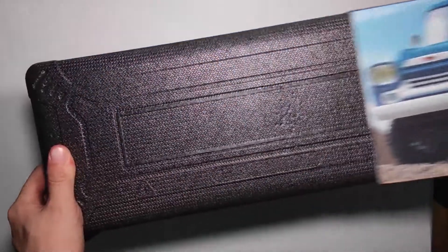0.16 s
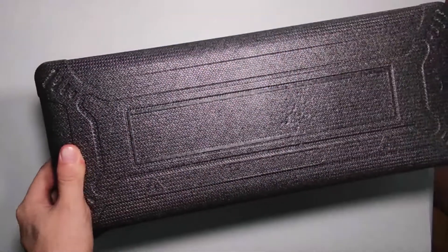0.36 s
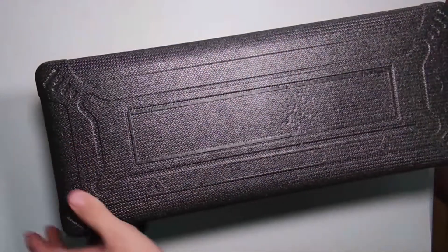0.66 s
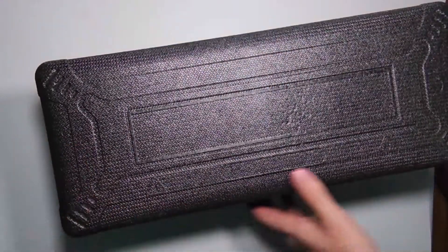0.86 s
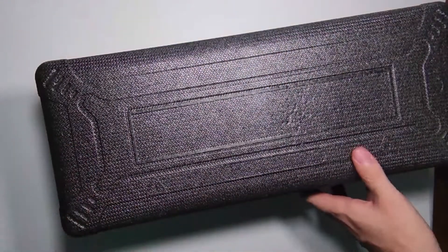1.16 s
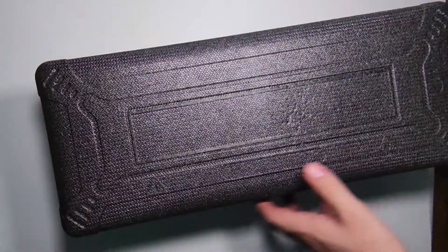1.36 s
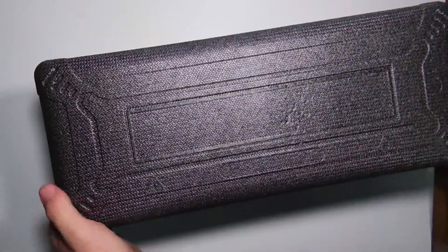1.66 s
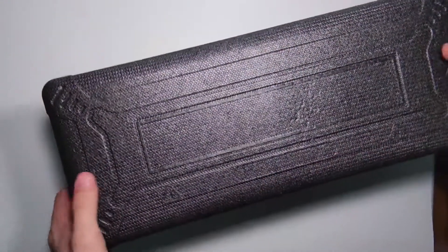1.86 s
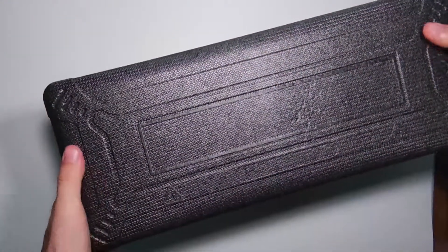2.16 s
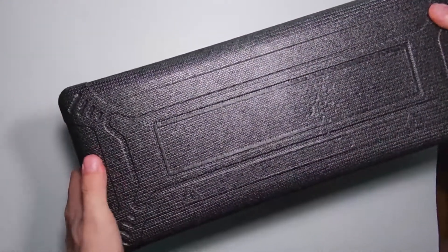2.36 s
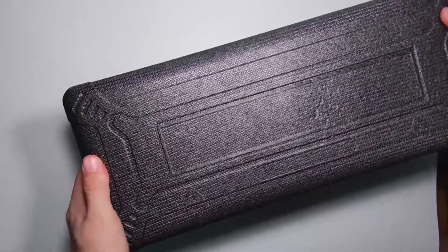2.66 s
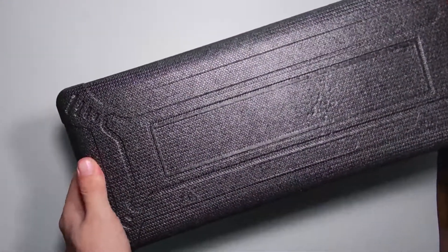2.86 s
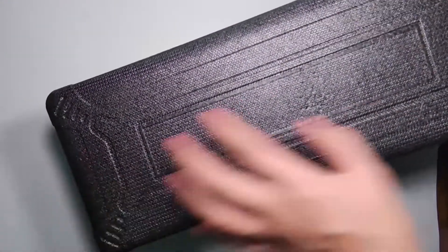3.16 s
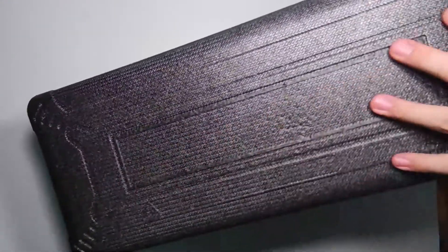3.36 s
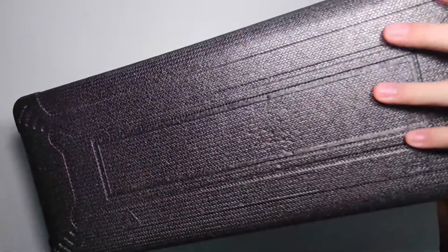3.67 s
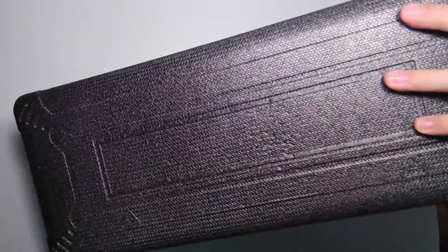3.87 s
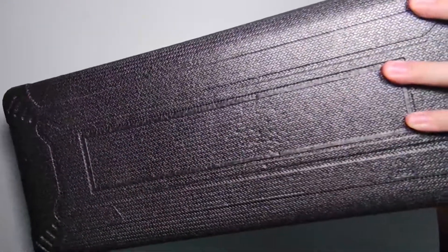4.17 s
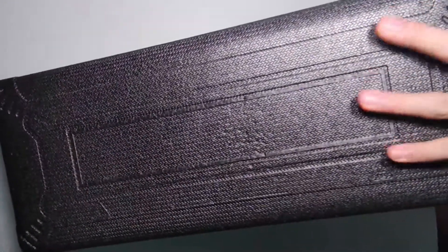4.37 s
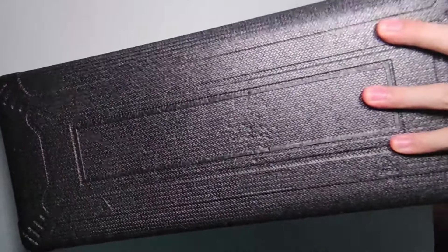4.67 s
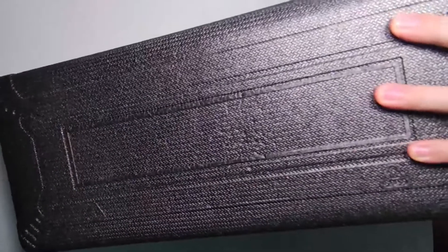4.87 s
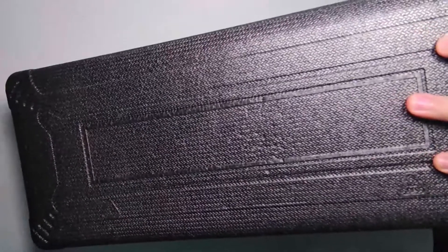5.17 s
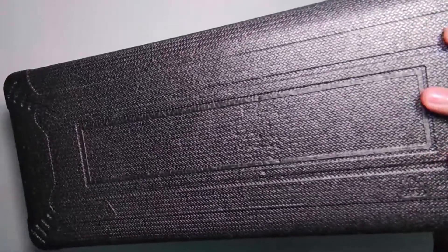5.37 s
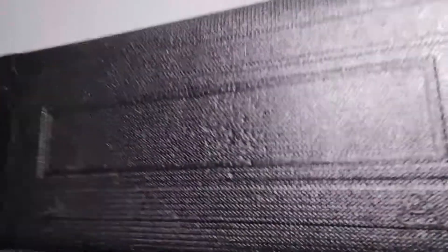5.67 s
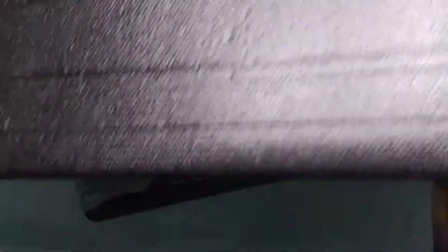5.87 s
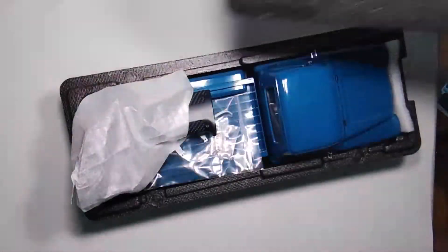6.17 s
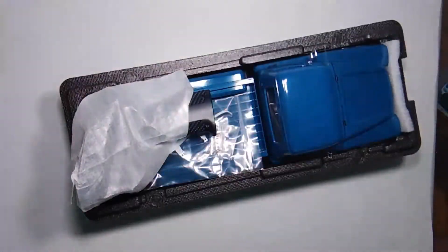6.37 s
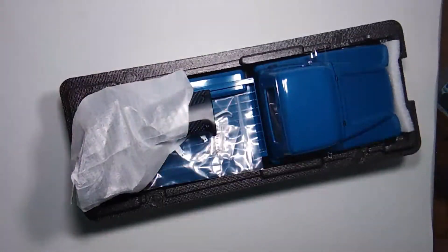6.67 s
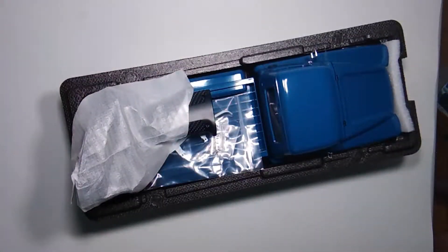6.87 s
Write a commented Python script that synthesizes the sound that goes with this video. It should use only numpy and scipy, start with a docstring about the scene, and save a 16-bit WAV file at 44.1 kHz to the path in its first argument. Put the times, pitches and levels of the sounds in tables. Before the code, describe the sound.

In a small quiet room, close to the microphone, a cardboard sleeve rasps quickly off a moulded tray with a rising hollow tone. It lands farther off with a loud flat slap and short skid. Hands softly rub, turn and tap the tray, then the tight lid scrapes free with hard hollow knocks and is gently shoved aside.

```python
"""In a small room a cardboard sleeve is pulled off a moulded tray, tossed aside and lands with a slap.
Hands rub and turn the tray on a table; its lid scrapes free, knocks hollowly and is shoved aside.
Rubbing is noise made of countless slips, squeaks and rasps are gliding resonances, and blows are
bursts of noise with damped modes. The walls answer with a decaying tail over faint room noise."""
import sys
import numpy as np
from scipy import signal
from scipy.fft import rfft, irfft, next_fast_len
from scipy.io import wavfile
from scipy.ndimage import uniform_filter1d, map_coordinates

SR = 44100
rng = np.random.default_rng(int(sys.argv[2]) if len(sys.argv) > 2 else 0)


def int16_out(signal):
    """Quantize to a 16-bit WAV file."""
    q = np.round(np.clip(np.atleast_2d(signal).T, -1, 1) * 32767)
    wavfile.write(sys.argv[1], SR, q.astype(np.int16))


N = 310023  # length in samples

# The quiet room's noise. Each row: frequency in Hz, relative level in dB.
AIR_SPECTRUM = [(12, -34.5), (20, -6), (27, 0), (419, -5.5), (456, -5.5), (603, -5), (1650, -11.5),
                (3040, -14.5), (5470, -17.5), (7650, -18.5), (10100, -18.5), (11000, -19), (15800, -18.5)]
# Decay of the room's tail. Each row: frequency in Hz, t60 (time to fall 60 dB) in seconds.
ROOM_DECAY = [(100, 1), (300, 0.42), (900, 0.37), (2500, 0.56), (5000, 0.6), (14000, 0.21)]

# The sleeve rubs along the tray as it is pulled off; layer gains follow.
# Each row: time in seconds, then body, hiss and rumble before those gains in dB.
SLEEVE_SLIDE = [(0.0, -43, -52, -68), (0.03, -49, -55.5, -50), (0.084, -43, -48.5, -46),
                (0.142, -45, -48, -59), (0.214, -45.5, -50, -58), (0.28, -40.5, -46.5, -77),
                (0.4, -38.5, -51, -49), (0.425, -50.5, -56, -47)]
# Hiss of card on plastic. Each row: frequency in Hz, relative level in dB.
CARD_SPECTRUM = [(820, -45), (1400, -9), (1500, -14), (1770, -4), (2040, -8.5), (2320, -3.5), (2960, -6.5),
                 (3250, -5), (4820, -10), (7310, -13), (9330, -15.5), (14600, -26.5), (15800, -34.5)]
# Body of the rubbed tray. Each row: frequency in Hz, relative level in dB.
TRAY_SPECTRUM = [(76, -38), (130, -22), (183, -2.5), (244, -4.5), (335, -0.5), (372, 1.5), (477, 1.5),
                 (551, -2), (884, -4), (957, -5.5), (1050, -7), (1750, -21), (3000, -35), (3900, -46),
                 (6600, -120)]
# The tray shifting on the table. Each row: frequency in Hz, relative level in dB.
RUMBLE_SPECTRUM = [(20, -5.5), (45, -16), (110, 1), (170, 0), (260, -13.5), (500, -53)]
# The air cavity between sleeve and tray sings upward as the sleeve slides off.
# Each row: time in seconds, base resonance in Hz, level in dB.
CAVITY_GLIDE = [(.02, 112.8, -68), (.1, 190.7, -59), (.19, 299, -43), (.27, 358, -41.5), (.34, 400, -54),
                (.39, 435, -35.5), (.42, 460, -62)]
# The cavity's overtones. Each row: ratio to the base resonance, relative level in dB.
CAVITY_OVERTONES = [(1.001, 7), (2.029, -7), (3.801, -14.5)]
# The sleeve chatters as it slides. Each row: time in seconds, mean slip rate in Hz, mean level in dB.
SLEEVE_CHATTER = [(.05, 446, -55), (.085, 496, -38), (.11, 543, -39), (.14, 548, -42), (.178, 552, -33.5),
                  (.2, 554, -42), (.23, 520, -58)]
# The sleeve's edge rasps. Each row: time in seconds, base resonance in Hz, level before a gain in dB.
EDGE_RASP = [(.08, 2200, -65), (.22, 2260, -56), (.3, 2370, -56), (.37, 2430, -55), (.41, 2500, -79)]
# The edge's resonances glide together. Each row: ratio to the base resonance, relative level in dB.
RASP_RATIOS = [(1, 3), (1.12, -1), (1.39, 1.5), (1.5, -4)]

# Soft bumps of the tray against the table.
# Each row: time in seconds, peak in dB, corner frequency in Hz, t60 in seconds.
TABLE_THUDS = [(0.439, -24, 380, 0.071), (0.472, -30, 259, 0.17), (2.947, -34, 450, 0.07),
               (3.171, -38, 200, .2), (3.424, -40.5, 220, 0.13), (4.151, -30, 420, 0.32),
               (4.538, -34.5, 380, 0.14), (4.786, -31, 161, 0.096), (4.818, -12.5, 452, 0.081),
               (4.86, -25, 244, 0.073), (5.084, -33.5, 218, 0.069), (5.258, -28.5, 134, .12),
               (5.297, -22.5, 179, 0.12), (6.46, -46.5, 224.4, 0.067), (6.748, -37, 190, .1),
               (6.908, -45.5, 330, 0.079), (6.997, -40, 200, 0.14)]

# Hands slide and turn the tray, one stroke a row; layer gains follow.
# Each row: start, attack, hold and release in seconds, level in dB, hiss and rumble over level in dB.
HAND_STROKES = [ (0.449, 0.0048, 0.022, 0.065, -39.5, -7.5, -2), (0.53, .03, 0.039, 0.35, -61, -8, 2),
                (0.66, .08, .05, 0.17, -57.5, 0.5, -23), (1.052, .008, 0.047, 0.077, -53, -4.5, -15),
                (1.44, 0.092, 0.11, 0.054, -52, -3.5, -7), (1.47, 0.044, .01, .08, -52.5, -16, -9.5),
                (1.85, .03, .03, 0.13, -44.5, -14.5, -11), (1.91, .05, 0.033, 0.26, -49, -3.5, -8),
                (2.12, .045, 0.0064, 0.35, -48, -7.5, -9), (2.302, 0.022, 0.048, 0.14, -39, -20, -20),
                (2.33, .05, 0.066, 0.19, -43.5, -9.5, -11.5), (2.49, .04, 0.0091, 0.064, -48, -16, -5.5),
                (2.61, .03, 0.383, 0.12, -52.5, -9.5, -7.5), (2.98, .14, 0.11, .07, -48.5, -5, -9),
                (3.11, .025, .01, 0.12, -42.5, -17, -12), (3.27, .02, 0.079, 0.16, -56.5, -7, -13),
                (3.41, .02, .2, 0.096, -54, -6, -4.5), (3.66, .04, 0.21, 0.43, -54, -8.5, -22),
                (3.76, .05, 0.0053, 0.123, -45, -8, -14), (4.06, .01, 0.0343, 0.16, -51, -9, -20),
                (4.15, .02, 0.148, .1, -54.5, -12, -6.5), (4.29, .05, .01, 0.26, -48.5, -5, -12),
                (4.36, .04, 0.058, 0.28, -44, -11, -12), (4.57, .04, .12, .05, -56.5, -9.5, -2),
                (4.69, .05, .02, .05, -50.5, -6.5, -5.5), (4.745, 0.022, .02, .04, -40, -8, -5),
                (4.785, .025, .005, 0.089, -29.5, -4, -15.5), (4.81, .02, 0.027, 0.18, -32, -16, -20),
                (4.97, .03, 0.012, 0.18, -47.5, -9, -11), (5.055, .03, 0.0093, 0.076, -45, -12, -14),
                (5.16, .02, 0.092, 0.089, -45.5, -14, -11.5), (5.32, .02, 0.0063, 0.066, -39, -30.5, -12),
                (5.41, .04, 0.0264, 0.24, -57.5, -11, -11), (5.53, .02, 0.073, 0.21, -56.5, 1, -10),
                (5.66, .045, 0.0041, 0.041, -42.5, -15, -24), (5.735, .02, 0.017, 0.1, -54.5, -5, -5),
                (5.845, 0.013, .005, .04, -66, 1, -14)]
# Hiss of the surface grain. Each row: frequency in Hz, relative level in dB.
GRAIN_SPECTRUM = [(820, -48), (1400, -4.5), (2020, -5), (2320, -3), (2960, -3), (3780, -3), (4820, -5.5),
                  (7240, -8), (9330, -12), (12000, -16.5), (15800, -24.5)]
# Fingertips catch and tap on the tray.
# Each row: time in seconds, nominal level in dB, low knock against the tick in dB before fixed factors.
FINGER_TAPS = [(0.609, -46.5, -14), (0.6316, -44.5, 2), (1.1076, -37.5, -4.5), (2.163, -34.5, 2.5),
               (2.2695, -34.5, -3), (2.6236, -40, 4), (2.6827, -49, 16.5), (2.7312, -42, 1),
               (2.8226, -35, -1.5), (3.193, -33, 2), (3.249, -45.5, 9), (3.276, -37.5, 3),
               (4.0332, -47.5, 10), (4.0656, -51.5, 17), (4.1535, -43.5, 9), (4.2316, -43, -13),
               (4.3779, -40.5, -7), (5.7573, -41.5, 6)]
# Tiny sharp snaps. Each row: time in seconds, peak in dB, pitch in Hz.
SHARP_SNAPS = [(5.618, -26.5, 6175), (5.95, -50.5, 2410), (5.96, -51, 2260)]

# The sleeve lands and settles; a gain and a low cut follow.
# Each row: time in seconds, peak in dB, bass in dB, treble in dB, first rebound delay in seconds,
# first rebound loss in dB.
SLEEVE_SLAPS = [(1.224, -44.5, -19.5, -14.5, 0.007, 5.5), (1.265, -28, 5, -20, .008, 5),
                (1.298, -36.5, -4, -26.5, 0.0073, 2.5), (1.6555, -7, -7, -6.5, .0038, 10),
                (1.74, -26.5, 14.5, 5, .008, 7.5), (1.776, -19.5, 0.5, -29.5, 0.0098, 4.5)]
# Noise of the slap. Each row: frequency in Hz, relative level in dB.
SLAP_SPECTRUM = [(59, -83), (100, -9.5), (146, -17), (222, -6), (492, -4), (718, -2.5), (780, -5),
                 (1090, -9), (1700, -5.5), (2090, -16.5), (2230, -17), (2580, -16.5), (4260, -20),
                 (5370, -29.5), (15000, -57.5)]
# Ring of the landing. Each row: frequency in Hz, mean relative level in dB, t60 in seconds.
SLEEVE_MODES = [(217, -13, .3), (497, 0, .07), (592, -11, .18), (1189, -15, .28), (1290, -11, .12),
                (1466, -11, .18), (1590, -10, .08), (1744, -9, .22), (1882, -23, .2), (2088, -17, .22),
                (2620, -26, .3), (2843, -26, .25), (3043, -23, .25), (3811, -25, .18), (4317, -28, .13)]
# Air in the hollow sleeve booms as it flexes. Each row: time in seconds, level before the low cut in dB.
SLEEVE_BOOMS = [(1.229, -41), (1.272, -24), (1.297, -20.5), (1.327, -31.5)]
# Ring of that air. Each row: frequency in Hz, mean relative level in dB, t60 in seconds.
HOLLOW_MODES = [(219.6, 0.5, .17), (395, -8, 0.1), (537, -4.5, 0.066), (606, -3, 0.1), (748, -5.5, 0.066)]
# The sleeve's edge skids along as it settles.
# Each row: start, attack, hold and release in seconds, level before the low cut in dB.
EDGE_SKIDS = [(1.26, .012, .045, .05, -42.5), (1.652, 0.0088, 0.025, 0.26, -30)]
# Noise of the skid. Each row: frequency in Hz, relative level in dB.
SKID_SPECTRUM = [(120, -38.5), (300, 3.5), (700, 7), (1600, -12.5), (2300, -9.5), (4000, -20), (7000, -25),
                 (15000, -45)]

# A thumb drags on the rim. Each row: time in seconds, resonance in Hz, level in dB.
THUMB_DRAG = [(2.1, 730, -62), (2.13, 900, -49), (2.15, 1050, -49), (2.17, 1184, -62)]
# Hard contacts of lid and tray.
# Each row: time in seconds, peak in dB, bass in dB, treble in dB, first rebound delay in seconds,
# first rebound loss in dB.
LID_KNOCKS = [(2.372, -33.5, 0, 2, 0.0089, 2), (4.161, -37.5, 18, -1, 0.0086, 3),
              (4.812, -23.5, 21, 11, .009, 7), (4.86, -26, -2, 1, .008, 14),
              (4.897, -26.5, -18.5, 13, 0.0084, 14), (4.9285, -8, -6.5, -0.5, 0.00554, 2),
              (5.1255, -17.5, 1, -4, 0.012, 3.5), (5.271, -15, -4.5, 0, .027, 10.5),
              (5.315, -28, 11, 4, 0.021, 10), (6.747, -31.5, -18, -1, 0.0054, 12.5),
              (6.996, -38.5, 5, 6.5, 0.0068, 8.5)]
# Noise of the knock. Each row: frequency in Hz, relative level in dB.
KNOCK_SPECTRUM = [(60, -74.5), (130, -11.5), (220, -4), (420, 1.5), (600, -1), (850, 5), (1020, -5.5),
                  (1250, -10), (1700, -22), (2200, -22.5), (3200, -23), (6000, -31), (11000, -42.5),
                  (15500, -57.5)]
# Ring of the lid. Each row: frequency in Hz, mean relative level in dB, t60 in seconds.
LID_MODES = [(424, -12.5, 0.28), (485, -15, .08), (666, -10.5, 0.1), (810, 0, 0.09), (894, -2, 0.098),
             (1187, -1, 0.061), (1310, -4.5, 0.033), (1620, -11.5, 0.076), (1740, -18, .07),
             (2056, -21, .1), (2487, -26.5, 0.15), (3100, -12, 0.045)]
# Skin squeaks thinly on the textured lid.
# Each row: time in seconds, base pitch in Hz, level before a gain in dB.
SKIN_SQUEAK = [(2.78, 11300, -84), (2.83, 11700, -72), (2.87, 12200, -72), (2.9, 12000, -74),
               (2.95, 12400, -70), (3.0, 12000, -71), (3.05, 11600, -84)]
# Fingertips squeak side by side. Each row: ratio to the base pitch, relative level in dB.
FINGERTIP_RATIOS = [(.85, -10), (.95, -4), (1, 0), (1.15, -11)]
# The tight lid tears free with a bright scrape. Each row: time in seconds, centre in Hz, level in dB.
LID_SCRAPE = [(4.77, 8440, -60.5), (4.8, 8500, -38.5), (4.812, 9000, -29.5), (4.83, 9500, -52.5),
              (4.87, 9440, -53.5), (4.9, 9400, -74.5)]
# The lid is shoved aside on the table; layer gains follow.
# Each row: start, attack, hold and release in seconds, level in dB, hiss and rumble over level in dB.
LID_SHOVES = [(6.44, 0.042, 0.022, 0.073, -55.5, -8.5, -8), (6.635, 0.0094, 0.023, 0.11, -40.5, -11, -17.5),
              (6.75, 0.047, 0.012, 0.077, -43, -11.5, -8)]
# Body of the lid on the table. Each row: frequency in Hz, relative level in dB.
SHOVE_SPECTRUM = [(76, -19.5), (130, -9), (183, -3), (391, -3.5), (584, 1.5), (812, 0.5), (870, 4.5),
                  (1780, -11.5), (2020, -16), (3500, -20), (4550, -43), (7700, -120)]

STROKE_FALL_DB = 23.5  # lost over one release time
FIDGET_SPAN_S = (2.55, 4.4)  # fainter taps fall at random while the tray is turned
FIDGET_LEAST_DB = -49  # lowest nominal level of a faint tap
SLEEVE_CUT_HZ = 60  # the sleeve's sounds fall away below this
TOP_HZ = 15850  # upper limit of the sound


def amp(db):
    """Level law: decibels to an amplitude ratio."""
    return 10 ** (np.asarray(db) / 20)


def unit(x):
    """Power normalisation: scale to rms 1."""
    return x / np.sqrt(np.mean(x ** 2) + 1e-20)


def along(points, hz):
    """Logarithmic pitch axis: read (Hz, value) points by interpolation in log frequency."""
    point_hz, value = np.transpose(points)
    return np.interp(np.log(hz + 1), np.log(point_hz + 1), value)


def curves(rows):
    """Linear interpolation: a gate with soft edges, then one value per sample for each column."""
    s, *cols = np.transpose(rows)
    t = np.arange(N) / SR
    inside = np.minimum(t - s[0], s[-1] - t)
    gate = np.clip(inside / 0.019 + 1.7, 0, 1)  # the fades lie just outside the rows
    return [gate] + [np.interp(t, s, c) for c in cols]


def wobble(rate):
    """Band-limited randomness: a smooth curve through rate random knots a second."""
    knots = rng.standard_normal(int(N * rate / SR) + 4)
    if rate > 1000:
        return map_coordinates(knots, [np.arange(N) * rate / SR])
    coarse = np.arange(0, N, 16)  # slow curves need fewer points
    return np.interp(np.arange(N), coarse, map_coordinates(knots, [coarse * rate / SR]))


def filtered(x, response):
    """Linear filtering: multiply the spectrum of x by a response of frequency."""
    m = next_fast_len(len(x) + 8192)
    return irfft(rfft(x, m) * response(np.fft.rfftfreq(m, 1 / SR)), m)[:len(x)]


def coloured(x, level_db):
    """Minimum phase: a causal filter whose gain in dB is a function of frequency."""
    size = 4096
    gain = np.maximum(amp(level_db(np.fft.rfftfreq(size, 1 / SR))), 1e-6)
    cepstrum = irfft(np.log(gain))
    cepstrum[1:size // 2] *= 2  # folding the cepstrum forward makes the filter causal
    cepstrum[size // 2 + 1:] = 0
    return signal.fftconvolve(x, irfft(np.exp(rfft(cepstrum))))[:len(x)]


def friction(spectrum, rate, grain_db, flutter_db, flutter_rate):
    """Dry friction: random slips of uneven size, bunched by the wavering grip, excite a spectrum."""
    happens = rng.random(N) < rate / SR  # rate: mean slips a second
    slips = happens * rng.standard_normal(N) * amp(grain_db * rng.standard_normal(N))
    bunched = slips * amp(flutter_db * wobble(flutter_rate))
    return unit(coloured(bunched, lambda hz: along(spectrum, hz)))


def rubbing(gains, body_spectrum, hiss_spectrum, body_gain_db, hiss_gain_db, grip_db):
    """Sliding contact: an uneven grip drives a dull body and low rumble, beside a fine hiss."""
    body, hiss, rumble = gains
    grip = amp(grip_db * wobble(35))
    dull = friction(body_spectrum, rate=4000, grain_db=1.5, flutter_db=0.56, flutter_rate=90)
    fine = friction(hiss_spectrum, rate=12000, grain_db=0.3, flutter_db=1.3, flutter_rate=70)
    low = friction(RUMBLE_SPECTRUM, rate=1500, grain_db=6, flutter_db=1.1, flutter_rate=27)
    return (amp(body_gain_db) * body * grip * dull
            + amp(hiss_gain_db) * hiss * fine
            + amp(-2.0) * rumble * grip * low)


def strands(rows, partials, width_hz, waver):
    """Coupled resonances: several noise bands follow one glide, each wavering on its own."""
    gate, hz, db = curves(rows)
    out = np.zeros(N)
    for ratio, level_db in partials:
        phase = 2 * np.pi * np.cumsum(ratio * hz * (1 + waver * wobble(30))) / SR
        band = wobble(width_hz) * np.sin(phase) + wobble(width_hz) * np.cos(phase)
        out += amp(level_db) * band
    return gate * amp(db) * unit(out)


def stick_slip(rows, jitter, jitter_rate, overtone_db, flutter_db):
    """Stick-slip oscillation: almost regular slips give an unsteady tone with a weak octave."""
    gate, hz, db = curves(rows)
    phase = 2 * np.pi * np.cumsum(hz * (1 + jitter * wobble(jitter_rate))) / SR
    tone = unit(np.sin(phase) + amp(overtone_db) * np.sin(2 * phase))
    return gate * amp(db + flutter_db * wobble(116)) * tone


def sleeve_slide():
    """Friction and cavity resonance: the sleeve rubs, chatters, sings and rasps along the tray."""
    gate, *slide_db = curves(SLEEVE_SLIDE)
    out = rubbing(gate * amp(slide_db), TRAY_SPECTRUM, CARD_SPECTRUM,
                  body_gain_db=-2.5, hiss_gain_db=0, grip_db=.8)
    out += stick_slip(SLEEVE_CHATTER, jitter=0.035, jitter_rate=280, overtone_db=-30, flutter_db=3.0)
    out += strands(CAVITY_GLIDE, CAVITY_OVERTONES, width_hz=70, waver=.01)
    return out + amp(3.5) * strands(EDGE_RASP, RASP_RATIOS, width_hz=130, waver=.02)


def add(track, s, x):
    """Superposition: mix x into the track at time s in seconds."""
    part = track[max(round(s * SR), 0):][:len(x)]
    part += x[:len(part)]


def burst(t60):
    """Exponential decay: half a second holding a dying puff of noise."""
    t = np.arange(SR // 2) / SR
    return rng.standard_normal(len(t)) * amp(-60 * t / t60)


def crush(t60, push):
    """Contact force: a sharp push, then a dying crumble."""
    return burst(t60) + push * signal.unit_impulse(SR // 2)


def strength(x):
    """Short-time power: scale a blow so its strongest 3 ms match the power of a sine of peak 1."""
    return x / np.sqrt(2 * uniform_filter1d(x * x, size=132).max() + 1e-20)


def thuds():
    """Soft contact: a push and crumble give a band below a corner frequency, thinning in the deep bass."""
    out = np.zeros(N)
    for s, db, corner_hz, t60 in TABLE_THUDS:
        def soft(hz):
            treble_loss = 1 + (hz / corner_hz) ** 8
            bass_loss = 1 + (corner_hz / (3.5 * hz + 1)) ** 4
            return -10 * np.log10(treble_loss * bass_loss)
        add(out, s, amp(db) * strength(coloured(crush(t60, push=29), soft)))
    return out


def stroke(start, attack, hold, release):
    """Speed envelope: a movement gathers speed, keeps it and dies away."""
    t = np.arange(N) / SR - start
    rise = np.sin(np.pi / 2 * np.clip(t / attack, 0, 1))
    return rise * amp(-STROKE_FALL_DB * np.clip((t - attack - hold) / release, 0, 10))


def efforts(strokes):
    """Power addition: overlapping strokes sum in power to gains of body, hiss and rumble."""
    power = np.zeros((3, N))
    for start, attack, hold, release, db, hiss_db, rumble_db in strokes:
        levels = amp([[db], [db + hiss_db], [db + rumble_db]])
        power += levels ** 2 * stroke(start, attack, hold, release) ** 2
    return np.sqrt(power)


def fingers():
    """Impulsive excitation: taps tick and knock the tray; the smallest snaps ring a few cycles."""
    out = np.zeros(N)
    faint = []
    for when, force, flesh in rng.random(size=(8, 3)):
        faint.append((np.interp(when, (0, 1), FIDGET_SPAN_S), FIDGET_LEAST_DB + 5 * force, 8 * flesh))
    for s, db, knock_db in list(FINGER_TAPS) + faint:
        tick = strength(coloured(crush(0.016, push=4), lambda hz: along(GRAIN_SPECTRUM, hz)))
        knock = strength(coloured(crush(0.034, push=10), lambda hz: along(TRAY_SPECTRUM, hz)))
        add(out, s, amp(db) * (tick / 2 + amp(knock_db) * knock * np.sqrt(.5)))
    for s, db, pitch_hz in SHARP_SNAPS:
        def peak(hz):
            detuning = hz / pitch_hz - pitch_hz / (hz + 1)
            return -30 * np.log10(1 + (3 * detuning) ** 2)
        snap = coloured(signal.unit_impulse(SR // 10), peak)
        add(out, s, amp(db) * snap / np.abs(snap).max())
    return out


def ring(modes):
    """Modal decay: damped modes of alternating sign, struck at slightly new strengths each time."""
    t = np.arange(SR // 2) / SR
    out = np.zeros(len(t))
    for k, (hz, db, t60) in enumerate(modes):
        envelope = amp(db + 2 * rng.normal() - 60 * t / t60)
        out += (-1) ** k * envelope * np.sin(2 * np.pi * hz * t)
    return out


def rebounds(rows, count, spread, steepen, bass_db, treble_db):
    """Inelastic bouncing: contacts grow weaker and farther apart; rebounds differ in colour."""
    out = []
    for s, db, bass, treble, gap, loss in rows:
        for k in range(count):
            again = k > 0
            out.append((s, db - loss * k ** steepen, bass + bass_db * again, treble + treble_db * again))
            s += gap * spread ** k
    return out


def blows(rows, spectrum, modes, crush_t60, push, ring_db, bass_hz, treble_hz):
    """Impact: each blow crushes the surface and rings the panel; its hardness colours both alike."""
    out = np.zeros(N)
    for s, db, bass_db, treble_db in rows:
        def hardness(hz):
            bass = bass_db / (1 + (hz / bass_hz) ** 4)
            treble = treble_db / (1 + (treble_hz / (hz + 1)) ** 4)
            return bass + treble
        crushing = strength(coloured(crush(crush_t60, push), lambda hz: along(spectrum, hz)))
        hit = crushing + amp(ring_db) * strength(ring(modes))
        add(out, s, amp(db) * strength(coloured(hit, hardness)))
    return out


def sleeve_landing():
    """Impact and cavity ring: the empty sleeve touches, booms, falls flat and skids to rest."""
    contacts = rebounds(SLEEVE_SLAPS, count=4, spread=1.85, steepen=.6, bass_db=7, treble_db=7)
    out = amp(1.5) * blows(contacts, SLAP_SPECTRUM, SLEEVE_MODES, crush_t60=0.053, push=7.8,
                           ring_db=-10.0, bass_hz=281.1, treble_hz=1790)
    for s, db in SLEEVE_BOOMS:
        add(out, s, amp(db) * strength(ring(HOLLOW_MODES)))
    rattle = friction(SKID_SPECTRUM, rate=2000, grain_db=2.5, flutter_db=2.4, flutter_rate=120)
    out += rattle * sum(amp(db) * stroke(*timing) for *timing, db in EDGE_SKIDS)
    return filtered(out, lambda hz: (1j * hz / (1j * hz + SLEEVE_CUT_HZ)) ** 2)


def resonance(rows, width_hz):
    """Resonant filtering: friction noise held in one gliding band, its width set by width_hz."""
    gate, hz, db = curves(rows)
    phase = 2 * np.pi * np.cumsum(hz) / SR
    band = wobble(width_hz) * np.sin(phase) + wobble(width_hz) * np.cos(phase)
    return gate * amp(db) * unit(band)


def hands():
    """Friction of skin: strokes rub the tray, fingertips tap it, a thumb drags and skin squeaks."""
    out = rubbing(efforts(HAND_STROKES), TRAY_SPECTRUM, GRAIN_SPECTRUM,
                  body_gain_db=0.58, hiss_gain_db=-0.45, grip_db=1.25)
    out += fingers() + resonance(THUMB_DRAG, width_hz=300)
    return out + amp(-0.5) * strands(SKIN_SQUEAK, FINGERTIP_RATIOS, width_hz=160, waver=.016)


def lid():
    """Impact and friction: the lid scrapes free and knocks on the rim of the tray."""
    contacts = rebounds(LID_KNOCKS, count=3, spread=5.3, steepen=3.1, bass_db=4.5, treble_db=-2.0)
    knocks = blows(contacts, KNOCK_SPECTRUM, LID_MODES, crush_t60=0.044, push=5.2,
                   ring_db=-5.5, bass_hz=320, treble_hz=2420)
    return knocks + resonance(LID_SCRAPE, width_hz=7500)


def lid_shoves():
    """Sliding contact: the lid rubs on the table as it is shoved aside."""
    return rubbing(efforts(LID_SHOVES), SHOVE_SPECTRUM, GRAIN_SPECTRUM,
                   body_gain_db=-2.5, hiss_gain_db=-1.0, grip_db=-0.2)


def room(x):
    """Reverberation: the walls answer with a noise tail whose highest treble dies first."""
    hz, t, bands = signal.stft(rng.standard_normal(SR), SR, nperseg=256)
    decay = amp(-60 * t / along(ROOM_DECAY, hz)[:, None])
    tail = signal.istft(bands * decay, SR, nperseg=256)[1]
    response = np.pad(tail / np.linalg.norm(tail), (SR // 150, 0))  # the tail starts after 1/150 s
    return signal.fftconvolve(x, response)[:N]


def room_air():
    """Stationary noise: a steady, shaped hush fills the quiet room."""
    hush = filtered(rng.standard_normal(N), lambda hz: amp(along(AIR_SPECTRUM, hz)))
    return amp(-66.0) * unit(hush)


def scene():
    """Direct-to-reverberant ratio: the tray is close and dry, the sleeve lands farther off."""
    near = sleeve_slide() + thuds() + hands() + lid() + lid_shoves()
    far = sleeve_landing()
    walls = amp(-19) * room(near) + amp(-9.5) * room(far)
    return (near + far + walls + room_air())[None]


def record(dry):
    """Band limiting: only what lies below the upper limit is kept."""
    return filtered(dry[0], lambda hz: hz < TOP_HZ)[None]


dry = scene()
out = record(dry)
int16_out(out)
```